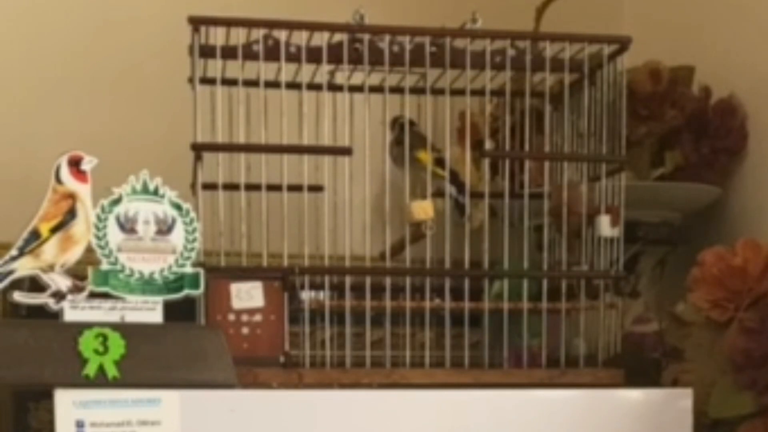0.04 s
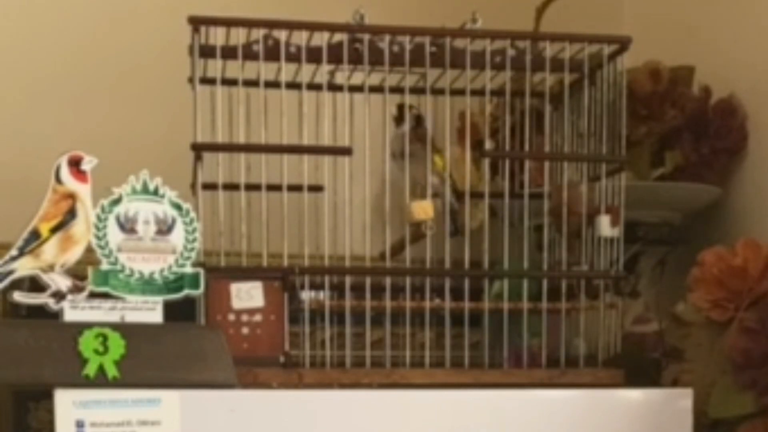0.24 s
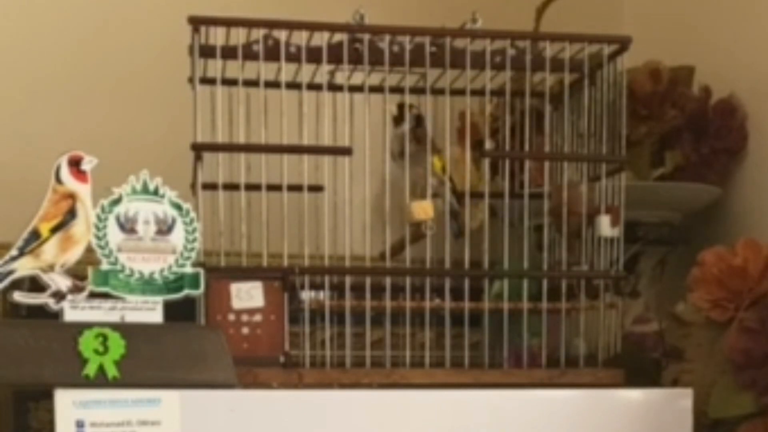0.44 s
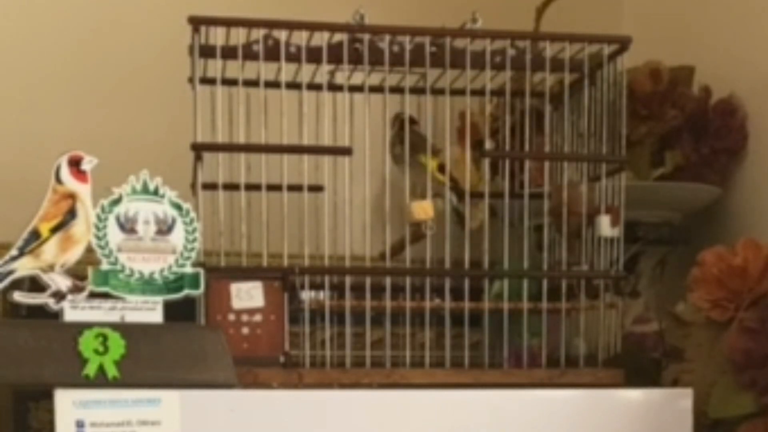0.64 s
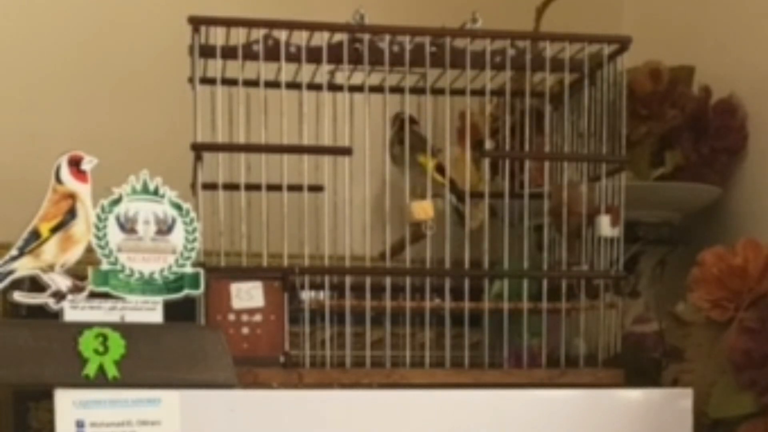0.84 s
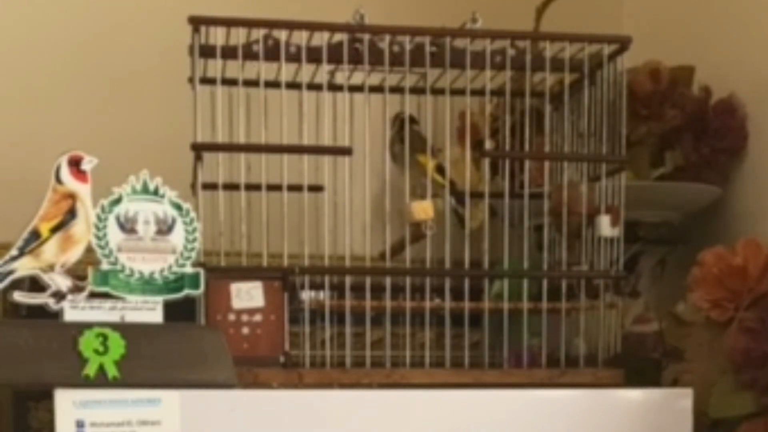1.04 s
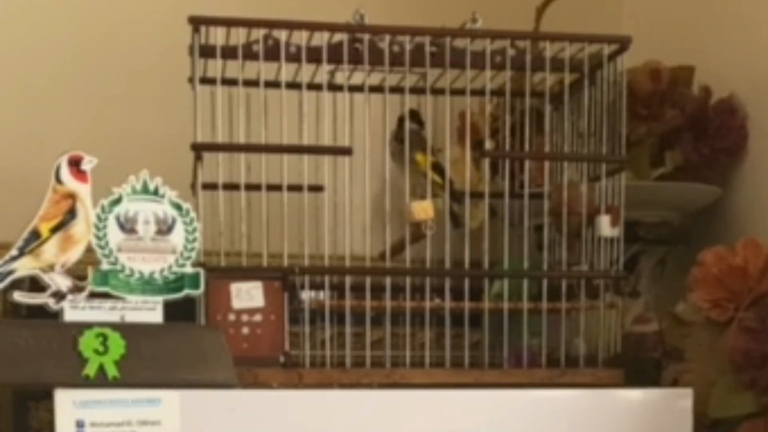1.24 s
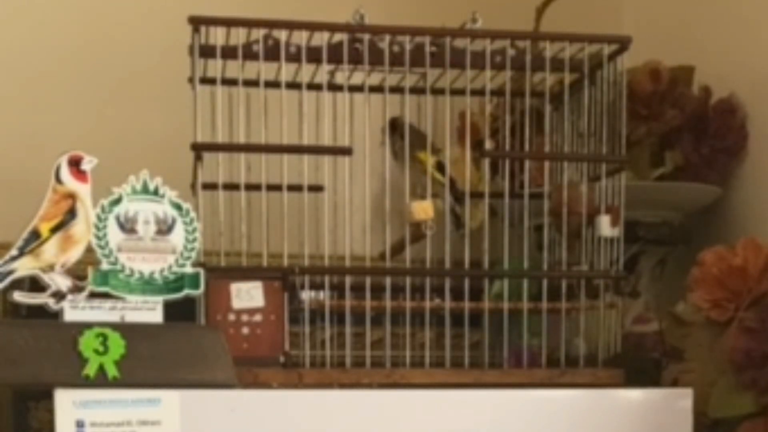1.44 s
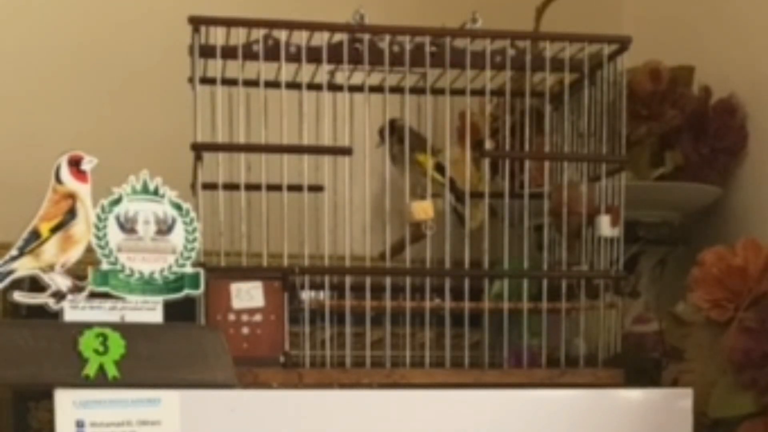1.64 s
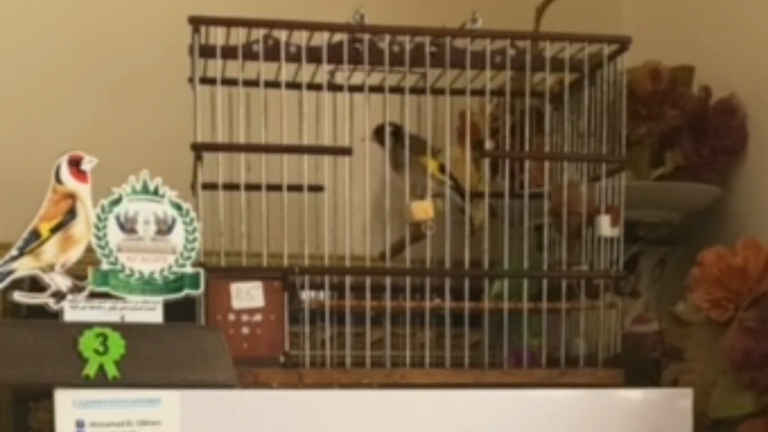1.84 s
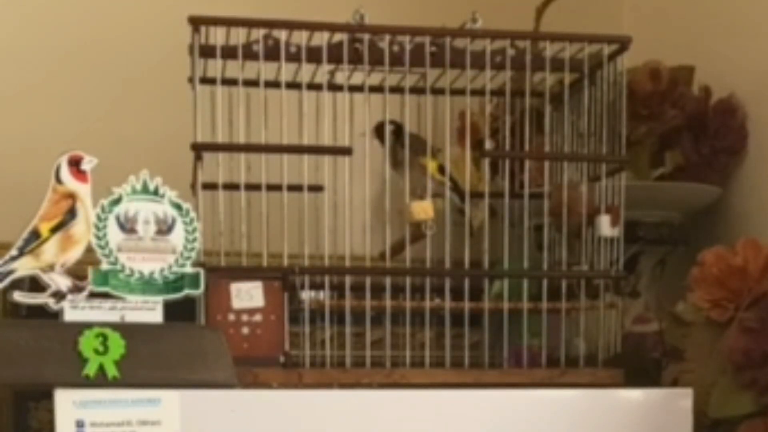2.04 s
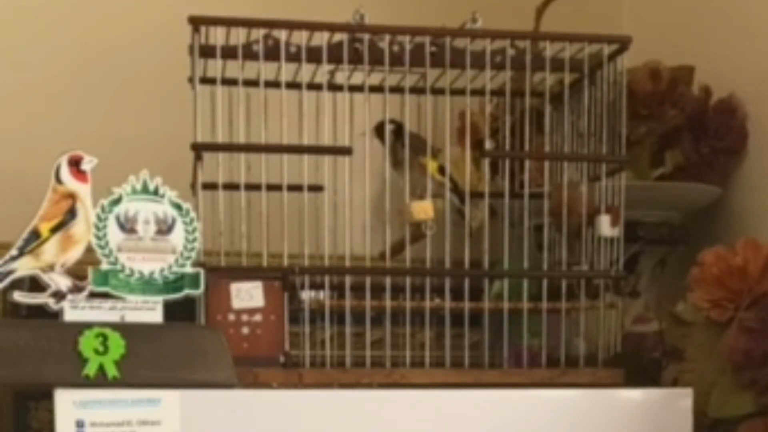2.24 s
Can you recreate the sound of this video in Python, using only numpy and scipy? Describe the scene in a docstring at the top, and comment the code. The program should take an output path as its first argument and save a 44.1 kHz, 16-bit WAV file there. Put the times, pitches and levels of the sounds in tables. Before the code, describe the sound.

A caged goldfinch ends a twittering phrase of quick rising chirps and whistles in a ringing room

```python
"""A caged goldfinch ends a phrase of rising chirps and short whistles in a bare, ringing room,
a little way from a phone. Each note is a gliding sine with its octave, with air hiss riding on it;
convolution with decaying noise smears the notes into a long shimmer.
Filtered noise makes the opening puff, the far birds and the room rumble."""
import sys
import numpy as np
from scipy import signal
from scipy.fft import rfft, irfft
from scipy.io import wavfile
from scipy.ndimage import uniform_filter1d

SR = 44100
rng = np.random.default_rng(int(sys.argv[2]) if len(sys.argv) > 2 else 0)


def transcribe(u):
    """Save the signal u as a 16-bit wav file named by the first command-line argument.

    u: samples, shape (n,) or (channels, n), limited to [-1, 1]; the rate is SR.
    q: integer samples, one column per channel.
    """
    v = np.clip(np.atleast_2d(u).T, -1, 1)
    q = np.round(v * 32767).astype(np.int16)
    wavfile.write(sys.argv[1], SR, q)


def decibels_to_gain(level_db):
    """Convert a level in decibels to a linear amplitude gain (20 dB per decade)."""
    exponent = np.asarray(level_db, float) / 20
    return 10 ** exponent


N = 99225  # samples, 2.25 s
LEAD_IN = 8820  # samples before time zero, 0.2 s


def level(x, db):
    """Mean-square power: scales a signal to a given rms in dB."""
    return x * decibels_to_gain(db) / np.sqrt(np.mean(x ** 2))


def walk(rate, size):
    """Band-limited fluctuation: random values held 1 / rate s and smoothed twice, spread near 1."""
    hold = max(int(SR / rate), 1)
    steps = np.repeat(rng.standard_normal(size)[:size // hold + 1], hold)
    smooth = uniform_filter1d(uniform_filter1d(steps, hold), hold)
    return 1.72 * smooth[:size]


def coloured(points, x):
    """Linear filtering: weights the spectrum by f/Hz, gain/dB points joined on a log-frequency axis."""
    point_hz, point_db = np.array(points).T
    hz = np.maximum(np.fft.rfftfreq(len(x), 1 / SR), 1)
    gain = decibels_to_gain(np.interp(np.log(hz), np.log(point_hz), point_db))
    return irfft(rfft(x) * gain, len(x))


def coloured_noise(points, size, db):
    """Subtractive synthesis: white noise filtered to a spectrum, then set to an rms."""
    return level(coloured(points, rng.standard_normal(size)), db)


def bell(t, start, length, rise, fall):
    """Amplitude envelope: soft rise, hold and fall, with rise and fall as shares of the length."""
    u = np.clip((t - start) / length, 0, 1)
    ramps = np.clip(u / rise, 0, 1) * np.clip((1 - u) / fall, 0, 1)
    return np.sin(np.pi / 2 * ramps) ** 2


def note(t, waver, start, length, from_hz, to_hz, db, tilt_db, octave_db, bend, rise, fall):
    """Frequency modulation in the syrinx: a gliding sine and its octave under a soft envelope."""
    u = np.clip((t - start) / length, 0, 1)
    # a larger bend brings the pitch near its goal earlier
    hz = (to_hz + (from_hz - to_hz) * (1 - u) ** bend) * waver
    phase = 2 * np.pi * np.cumsum(hz) / SR
    # db is the rms of the fundamental at mid-note; tilt_db is the change from start to end
    size = np.sqrt(2) * bell(t, start, length, rise, fall) * decibels_to_gain(db + tilt_db * (u - .5))
    return size * (np.sin(phase) + decibels_to_gain(octave_db) * np.sin(2 * phase))


# whistles sung just before, of which only the echo is left:
# start t/s, length t/s, from f/Hz, to f/Hz, level/dB
EARLIER_WHISTLES = [(-.15, .04, 3200, 3180, -44), (-.12, .04, 4190, 4170, -47)]
# short whistles, most of which sag a little: start t/s, length t/s, from f/Hz, to f/Hz, level/dB
WHISTLE_NOTES = [(0.222, .032, 5562, 5140, -30.5), (.400, 0.037, 5054, 4800, -21.5),
                 (0.597, 0.018, 5804, 5593, -33), (.614, 0.021, 4950, 4990, -19),
                 (0.804, 0.022, 5776, 5600, -34.5), (0.826, 0.0286, 5031, 4857, -20),
                 (0.915, 0.042, 3865, 3882, -24.5), (0.96, 0.03, 6473, 6405, -27),
                 (1.108, 0.021, 3794, 3725, -24), (1.145, 0.019, 6324, 6493, -29)]


def whistles(t, waver):
    """Near-sinusoidal oscillation: short tones with little glide and a weak second harmonic."""
    return sum(note(t, waver, *row, tilt_db=0, octave_db=-40.5, bend=2.2, rise=.55, fall=.13)
               for row in EARLIER_WHISTLES + WHISTLE_NOTES)


# relative spectrum of the air hiss: f/Hz, level/dB
BREATH_COLOUR = [(1100, -35.5), (1600, -9), (2500, 1.5), (5000, 0), (6500, -28.5)]


def breath(notes):
    """Turbulence noise: air hiss whose amplitude follows the smoothed magnitude of the notes."""
    hiss = coloured_noise(BREATH_COLOUR, len(notes), -47.5)  # dB, before the notes scale it
    return hiss * uniform_filter1d(np.abs(notes), size=88)  # 2 ms


# single reflections from table and wall: delay t/s, level/dB
REFLECTIONS = [(.00166, -11.5), (.0075, -1.5), (.019, -8.5)]


def room():
    """Impulse response: direct sound, early reflections and a dense exponentially decaying tail."""
    gap_s, build_s = 0.0014, 0.0067
    early_db, early_t60_s = -3, 0.29
    tail_db, low_t60_s, treble_t60_s, treble_hz = -4, 0.78, 0.4, 7200
    t = np.arange(SR) / SR
    late = np.maximum(t - gap_s, 0)
    tail_noise, early_noise = rng.standard_normal((2, SR))

    def fade(t60):
        """Exponential decay: a fall of 60 dB in each t60 seconds."""
        return decibels_to_gain(-60 * t / t60)

    # the treble dies away sooner than the rest
    low = signal.sosfilt(signal.butter(6, treble_hz, fs=SR, output="sos"), tail_noise)
    high = signal.sosfilt(signal.butter(6, treble_hz, "high", fs=SR, output="sos"), tail_noise)
    tail = low * fade(low_t60_s) + high * fade(treble_t60_s)
    tail = tail * (1 - np.exp(-late / build_s))
    early = early_noise * fade(early_t60_s) * (late > 0)
    direct = t == 0
    single = sum(decibels_to_gain(db) * np.sinc((t - delay) * SR) for delay, db in REFLECTIONS)
    # dividing by sqrt(SR) turns rms over this one second into total energy
    diffuse = (level(early, early_db) + level(tail, tail_db)) / np.sqrt(SR)
    return direct + single + diffuse


# relative spectrum of the distant twitter: f/Hz, level/dB
TWITTER_COLOUR = [(2300, -25.5), (2900, -3.5), (3300, -3.5), (3800, -4.5), (4500, 2.5), (5300, -4.5),
                  (5700, -14), (6700, -21.5), (7000, -45)]
# slow gain of the distant twitter: t/s, level/dB
TWITTER_SWELL = [(0, -10), (1.201, -6), (1.701, -6.5), (2.0, -8), (2.25, -14)]


def far_twitter(t):
    """Diffuse superposition: distant birds merge into filtered noise of slowly wandering level."""
    wash = coloured_noise(TWITTER_COLOUR, len(t), -64)  # dB, before the swell
    swell_db = np.interp(t, *np.array(TWITTER_SWELL).T)
    return wash * decibels_to_gain(swell_db + 0.67 * walk(4.6, size=len(t)))


# relative spectrum of the room rumble: f/Hz, level/dB
RUMBLE_COLOUR = [(20, -27.5), (40, 0), (130, -5.5), (250, -12.5), (500, -17), (700, -23.5), (1200, -27.5),
                 (2600, -29), (3400, -49)]


def room_rumble(size):
    """Stationary random noise: a steady background, strongest at low frequencies."""
    return coloured_noise(RUMBLE_COLOUR, size, -74)


# the harsh puff that opens the phrase: start t/s, length t/s, level/dB before the envelope
PUFF_EVENT = (0.045, 0.035, -42)
# relative spectrum of the puff: f/Hz, level/dB
PUFF_SPECTRUM = [(900, -50), (1400, -14.5), (1800, -15), (2500, 2), (4500, 1), (5200, -20.5), (6200, -28.5),
                 (6500, -50.5)]


def puff(t):
    """Noise burst: filtered noise under a slow rise and a quick fall."""
    start, length, db = PUFF_EVENT
    return coloured_noise(PUFF_SPECTRUM, len(t), db) * bell(t, start, length, rise=1.0, fall=0.13)


# rising chirps: start t/s, length t/s, from f/Hz, to f/Hz, level/dB,
# level at the end minus start/dB, octave re fundamental/dB
CHIRP_NOTES = [(.068, .018, 2600, 4857, -33.5, 18.5, -33.5), (.153, .018, 3170, 3776, -30, 6.5, -54.5),
               (0.166, 0.025, 3725, 4630, -37.5, -2.5, -36.5), (.283, .018, 3122, 3740, -28.5, 9.5, -47.5),
               (0.294, 0.029, 3777, 4746, -35.5, -6.5, -53), (0.483, 0.034, 3200, 4385, -21.5, 5.5, -40.5),
               (0.692, 0.045, 3300, 4444, -22.5, -0.5, -36.5), (0.901, 0.025, 3200, 3732, -29.5, -3, -40.5),
               (0.999, .022, 3700, 5103, -25, 8.5, -38.5), (1.021, 0.021, 4500, 5130, -23, 8, -40),
               (1.091, 0.023, 3010, 3467, -34, 0, -28), (1.195, .024, 3970, 5292, -27, -1, -35),
               (1.231, 0.015, 4500, 5164, -26.5, -9.5, -49)]


def chirps(t, waver):
    """Upward frequency sweep: each note glides to a higher pitch as its level tilts."""
    return sum(note(t, waver, *row, bend=1.3, rise=.18, fall=.16) for row in CHIRP_NOTES)


# soft low lead-in notes: start t/s, length t/s, from f/Hz, to f/Hz, level/dB,
# octave re fundamental/dB
LEAD_NOTES = [(0.364, 0.049, 2185, 2889, -43.5, 2), (0.575, 0.028, 2383, 2891, -42, -11.5),
              (0.782, 0.027, 2252, 2892, -42.5, -10)]


def lead_ins(t, waver):
    """Harmonic enrichment: low swelling notes with a strong octave and an early, rapid glide."""
    return sum(note(t, waver, *row, tilt_db=7, octave_db=octave_db, bend=13, rise=.22, fall=.067)
               for *row, octave_db in LEAD_NOTES)


# phrases of far birds, smeared into bands:
# start t/s, length t/s, centre f/Hz, half-level-span width f/Hz, level/dB before the envelope
FAR_PHRASES = [(1.677, 0.41, 5850, 506.3, -77), (1.834, 0.37, 3330, 200, -75.5),
               (1.94, 0.39, 5317, 300, -71.5), (1.924, 0.3, 6650, 196, -81.5),
               (2.158, 0.36, 3200, 205, -78), (1.848, 0.13, 4640, 201.4, -77)]


def far_calls(t):
    """Narrow-band noise: far phrases that stand out, blurred into bands with soft envelopes."""
    out = np.zeros(len(t))
    for start, length, hz, width, db in FAR_PHRASES:
        # flat across the width, falling by 60 dB within half a width on either side
        band = [(hz - width, -60), (hz - width / 2, 0), (hz + width / 2, 0), (hz + width, -60)]
        out = out + coloured_noise(band, len(t), db) * bell(t, start, length, rise=0.1, fall=0.56)
    return out


# what beak and microphone let through: f/Hz, level/dB
BEAK_AND_MICROPHONE = [(1500, -7.5), (3100, 2.5), (3600, 1), (3900, -1.5), (4250, 0.5), (4900, -1),
                       (5700, 0), (6500, -5), (7000, -29.5), (7700, -14.5), (8700, 9), (9900, -9.5)]


def goldfinch(t):
    """Source and filter: all notes, their hiss and the puff pass through beak and microphone."""
    waver = 1 + .003 * walk(300, size=len(t))  # quick pitch unsteadiness, as a share
    notes = whistles(t, waver) + chirps(t, waver) + lead_ins(t, waver)
    return coloured(BEAK_AND_MICROPHONE, notes + breath(notes) + puff(t))


def scene():
    """Convolution and superposition: the bird through the room, over the background."""
    t = (np.arange(N + LEAD_IN) - LEAD_IN) / SR
    bird = signal.fftconvolve(goldfinch(t), room())[LEAD_IN:LEAD_IN + N]
    heard_t = t[LEAD_IN:]
    background = far_twitter(heard_t) + far_calls(heard_t) + room_rumble(N)
    return (bird + background)[None]


def top_cut(x):
    """Nothing passes above the cut-off."""
    return signal.sosfilt(signal.butter(12, 9920, fs=SR, output="sos"), x)


def record(dry):
    """Low-pass filtering: the phone cuts the top steeply above 9900 Hz."""
    lowpass = signal.ellip(10, .2, 80, 9900, fs=SR, output="sos")  # 0.2 dB ripple, 80 dB rejection
    mix = signal.sosfilt(lowpass, dry)
    return top_cut(mix)


dry = scene()
out = record(dry)
transcribe(out)
```